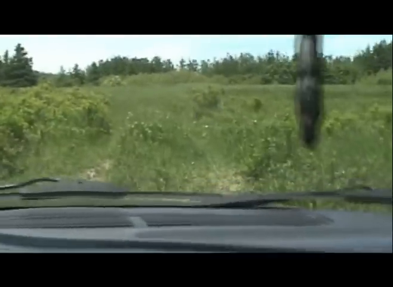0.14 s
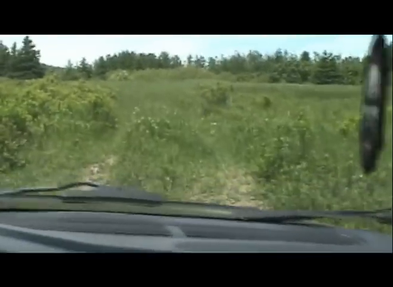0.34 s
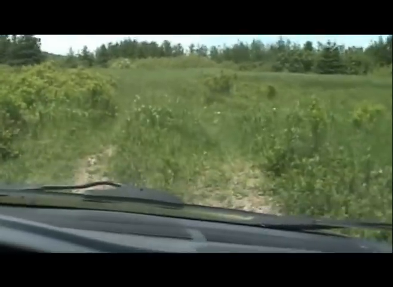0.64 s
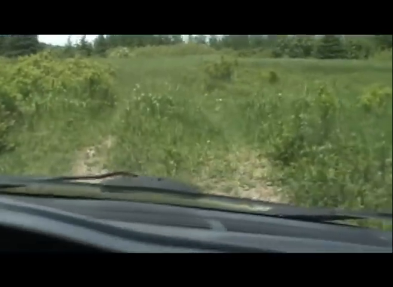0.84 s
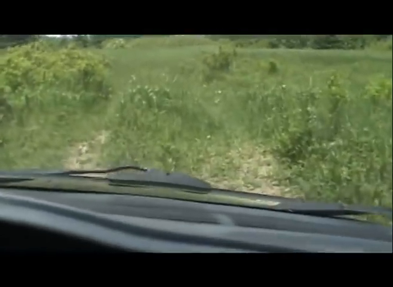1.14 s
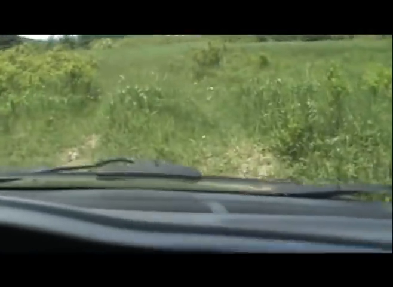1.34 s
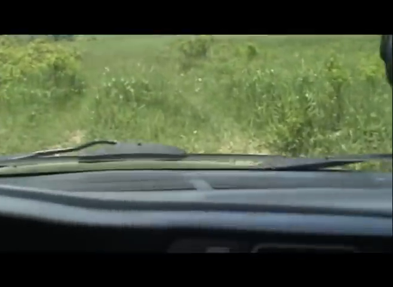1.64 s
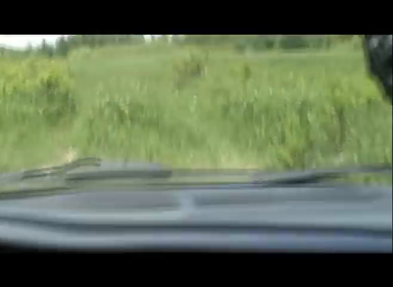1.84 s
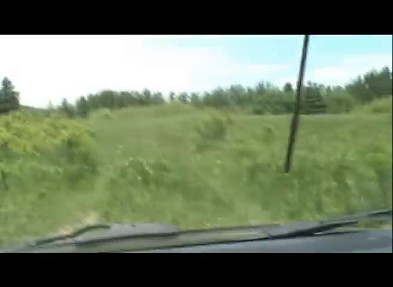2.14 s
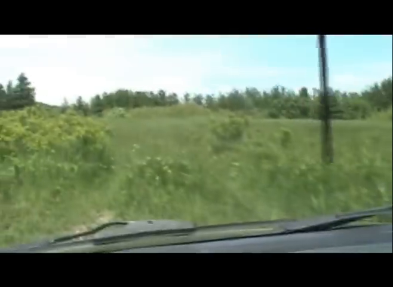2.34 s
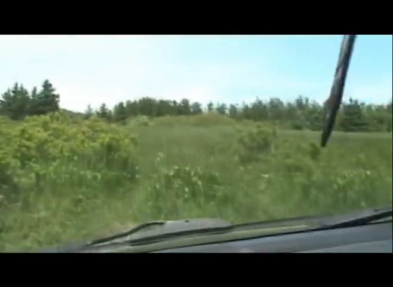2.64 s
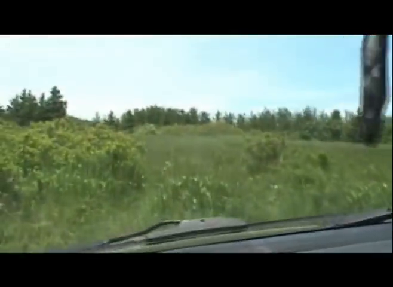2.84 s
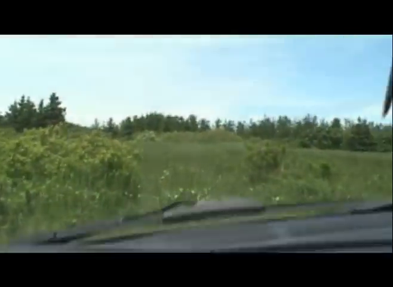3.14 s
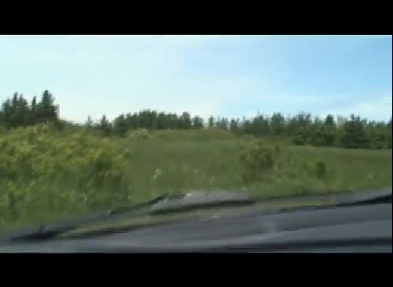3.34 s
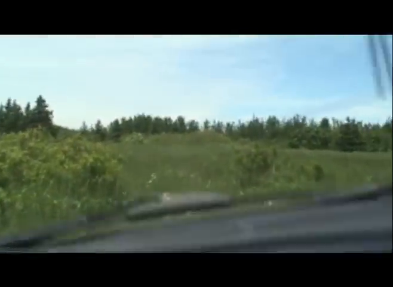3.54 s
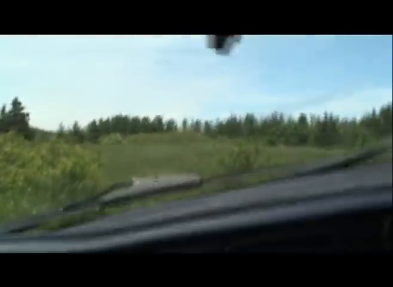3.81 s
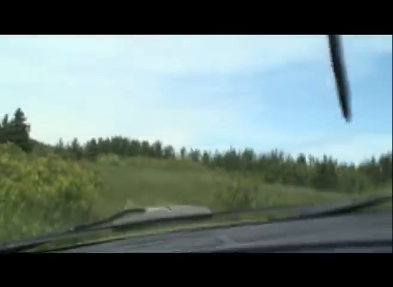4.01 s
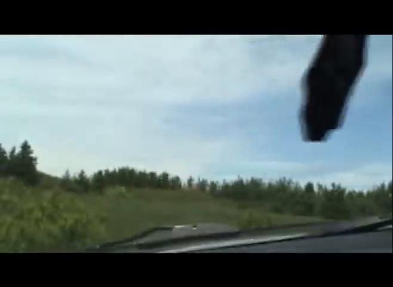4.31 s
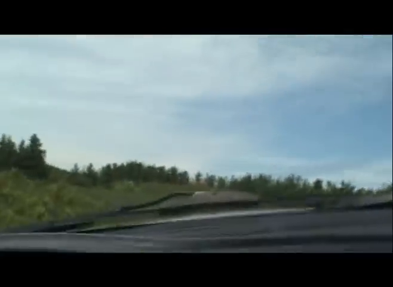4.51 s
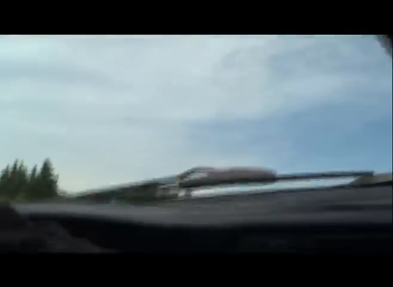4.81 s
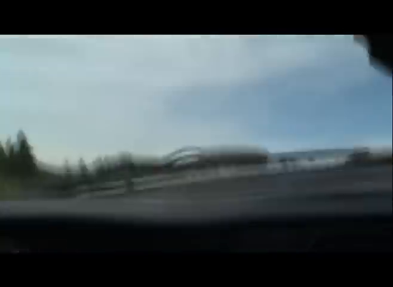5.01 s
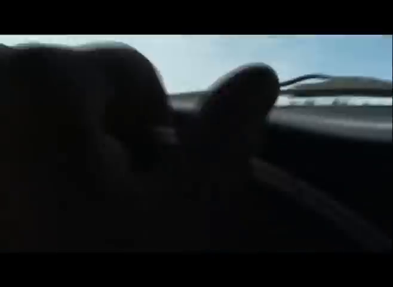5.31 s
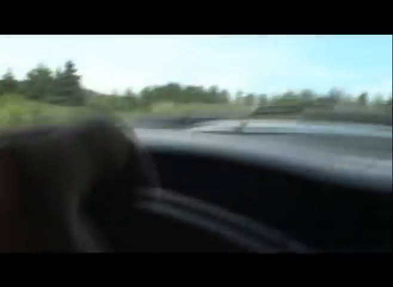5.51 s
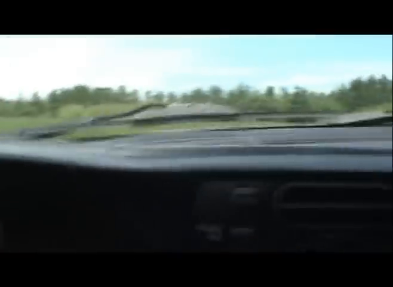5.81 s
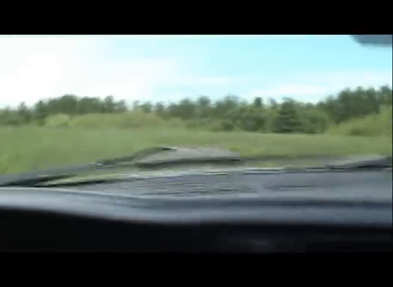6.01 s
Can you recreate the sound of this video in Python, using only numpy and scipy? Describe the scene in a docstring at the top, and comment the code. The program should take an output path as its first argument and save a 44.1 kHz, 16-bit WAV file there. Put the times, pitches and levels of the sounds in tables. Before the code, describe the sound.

Heard from inside, a pickup rumbles over bumpy ground while loose gear knocks and the trim rattles harder and harder.

```python
"""Pickup cab on a rough trail

A six-cylinder pickup crawls over grassy ruts, heard from inside. The engine hums low, the tyres rumble
through the body and the suspension thumps. Loose trim and gear knock, creak and rattle; a vent hisses.
Of the two microphones, the right is weak in the bass and the left overloads on the big jolts."""
import sys
import numpy as np
from scipy import signal
from scipy.fft import rfft, irfft, next_fast_len
from scipy.io import wavfile
from scipy.ndimage import uniform_filter1d

SR = 44100
rng = np.random.default_rng(int(sys.argv[2]) if len(sys.argv) > 2 else 0)


def master(y):
    """Save y as 16-bit WAV."""
    cut = np.clip(np.atleast_2d(y).T, -1, 1)
    pcm = np.round(cut * 32767)  # scale
    wavfile.write(sys.argv[1], SR, pcm.astype(np.int16))


N = 271656
TIME = np.arange(N) / SR

# pitches at which the trim panels ring: f/Hz, width/Hz, level/dB
TRIM_PANELS = [(462, 78, 5), (749, 69, 4.5), (926, 35, 0.5), (1240, 770, -4.5), (1940, 110, -0.5),
               (2440, 520, -6.5), (3000, 110, -20), (3890, 920, -4), (4580, 1500, -13), (6140, 2400, -1),
               (9470, 1400, -7)]
# tone of the cab's deep boom: f/Hz, level/dB
BOOM_TONE = [(40, -57), (62, -2), (100, -3.5), (125, 3.5), (175, 5), (240, 3), (300, -0.5), (360, -11),
             (600, -32), (3000, -70.5)]


def undb(db):
    """Turn decibels into a gain."""
    return 10 ** (np.asarray(db) / 20)


def unit(x):
    """Scale to an average (rms) level of 1."""
    return x / np.sqrt(np.mean(x ** 2))


def curves(table):
    """Join rows of (time, values) with straight lines: one curve per value column."""
    times, *columns = np.transpose(table)
    return [np.interp(TIME, times, column) for column in columns]


def add(out, start, x):
    """Mix x into out from start, in seconds."""
    i = max(int(start * SR), 0)
    out[..., i:i + x.shape[-1]] += x[..., :N - i]


def colour(x, points):
    """Shape the tone of x along points of f/Hz, level/dB."""
    n = next_fast_len(x.shape[-1] + 4096)
    hz, db = np.transpose(points)
    log_gain = np.log(undb(np.interp(np.log(np.fft.rfftfreq(n, 1 / SR) + 1), np.log(hz), db)))
    cepstrum = irfft(log_gain, n)
    cepstrum[1:n // 2] *= 2  # folded so that the filter rings only after a hit
    cepstrum[n // 2 + 1:] = 0
    return irfft(rfft(x, n) * np.exp(rfft(cepstrum)), n)[..., :x.shape[-1]]


def resonate(x, hz, width):
    """Let x ring at one pitch; a narrower width rings longer."""
    return signal.lfilter(*signal.iirpeak(hz, hz / width, fs=SR), x)


def walk(rate):
    """A smooth random wobble that takes rate steps a second."""
    hold = int(SR / rate)
    steps = np.repeat(rng.standard_normal(N // hold + 1), hold)
    return unit(uniform_filter1d(uniform_filter1d(steps, hold), hold)[:N])


def stereo_noise(size, spread):
    """Noise for left and right; more spread makes it wider."""
    mid, side = rng.standard_normal((2, size))
    return np.array([mid + spread * side, mid - spread * side])


def muffle(x, top_hz=12500):
    """Sound that comes through panels and ducts loses its highest treble."""
    return signal.sosfilt(signal.ellip(6, .5, 60, top_hz, fs=SR, output="sos"), x)


def vent():
    """Steady air hisses from the dashboard, with a faint thin whistle."""
    # tone of the air: f/Hz, level/dB
    air_tone = [(1500, -3.5), (3500, -3), (5000, 0), (5750, 6), (6500, -2.5), (8000, -9), (10500, -7.5),
                (12500, -19.5)]
    hiss = unit(colour(stereo_noise(N, .45), air_tone)) * undb(-53)
    whistle_hz = 7975 + 20 * walk(30)
    whistle = np.sin(2 * np.pi * np.cumsum(whistle_hz) / SR) * undb(-72 + 2 * walk(5))
    return hiss + whistle


def rattle(rattle_db):
    """Trim and twigs under the truck make countless tiny hits, each ringing mostly one panel."""
    # tone of the rattle: f/Hz, level/dB
    rattle_tone = [(600, -4.5), (1200, 6), (1800, -4.5), (2600, 2.5), (4000, -1.5), (6500, -7),
                   (9000, -8.5), (12500, -34)]
    hits_per_s = 70 * undb(.6 * (rattle_db + 43))  # harder shaking, more hits
    fade, grains = undb(-60 / (.059 * SR)), 0
    for hz, width, _ in TRIM_PANELS[2:]:
        hits = rng.random(N) < hits_per_s / SR
        ticks = hits * undb(5.3 * np.minimum(rng.exponential(size=N), 4))
        bursts = stereo_noise(N, .96) * np.sqrt(signal.lfilter([1], [1, -fade ** 2], ticks ** 2))
        grains = grains + .3 * bursts + resonate(bursts, hz, 2 * width)
    return unit(colour(grains, rattle_tone)) * undb(rattle_db)


def creaks():
    """The seat and panels stick and slip in quick jerks that ring at one pitch."""
    # each creak: t/s, length/s, f/Hz, level/dB
    rubs = [(2.13, 0.048, 640, -28.5), (2.71, 0.033, 527, -29.5), (4.963, 0.039, 960, -19),
            (5.7, 0.018, 2102, -33), (5.718, 0.017, 3475, -29)]
    out = np.zeros(N)
    for start, length, hz, db in rubs:
        times = np.cumsum(rng.uniform(.002, .006, size=40))
        times = times[times < length]
        slips = np.zeros(SR // 8)
        slips[(times * SR).astype(int)] = rng.uniform(.84, 1, len(times)) * (1 - .5 * times / length)
        ring = resonate(resonate(slips, hz, hz * .25), hz, hz * .7)
        add(out, start, ring * undb(db) / np.sqrt(np.sum(ring ** 2) / (length * SR)))
    return out


def clinks():
    """A small metal piece, shaken by some of the knocks, rings anew at each bounce."""
    # each shake: t/s, level/dB
    shakes = [(5.834, -25), (5.906, -29.5), (5.992, -39)]
    # notes of the metal: f/Hz, level/dB, time to fade by 60 dB/s
    metal_notes = [(3332, -5, .05), (4490, -7, .07), (5932, 0, .1), (7973, -6, .1), (9458, -7, .06)]
    hz, note_db, fade_s = np.transpose(metal_notes)[:, :, None]
    out, t = np.zeros((2, N)), TIME[:SR // 4]
    for start, db in shakes:
        for delay in np.append(0, rng.uniform(.002, .022, size=3)):
            detune = 1 + .004 * rng.standard_normal(hz.shape)
            phase = 2 * np.pi * (hz * t * detune + rng.random((2, *hz.shape)))
            ring = np.sum(undb(db + note_db - 60 * t / fade_s) * np.sin(phase), axis=1)
            add(out, start + delay, ring * undb(-2.5 - 200 * delay))  # later bounces are softer
    return out


def taps(fade_s=.04):
    """Small hard parts chatter where they sit, each ringing around one pitch."""
    # each tap: t/s, f/Hz, level/dB
    hits = [(.66, 3400, -35), (1.017, 4240, -26), (1.762, 3900, -29), (1.806, 3420, -32), (2.12, 660, -12),
            (3.36, 5496, -16.5), (4.215, 2034, -19), (4.954, 4176, -12.5), (4.985, 2370, -19),
            (5.277, 2000, -18.5), (5.491, 14000, -35), (5.833, 2890, -9.5), (5.907, 892, -5.5),
            (5.993, 14300, -27)]
    out, t = np.zeros((2, N)), TIME[:SR // 10]
    for start, hz, db in hits:
        chatter = stereo_noise(len(t), .69) * undb(-60 * t / fade_s)
        ring = resonate(resonate(chatter, hz, 180 + .06 * hz), hz, .6 * hz)
        add(out, start, ring / abs(ring).max() * undb(db + 1))
    return out


def shaking(rise_s=.037, fall_s=.045):
    """Extra decibels while a jolt shakes the whole truck: they rise, hold and fall."""
    # each jolt: t/s, length/s, boost/dB
    jolts = [(1.02, 0.048, 4.2), (2.11, 0.078, 2.63), (2.5, 0.018, 4.6), (2.783, .04, 7.7),
             (3.192, 0.082, 4.3), (4.708, 0.27, 6.1), (4.798, 0.058, 3.3)]
    return sum(db * np.interp(TIME, [at - rise_s, at, at + length, at + length + fall_s], [0, 1, 1, 0])
               for at, length, db in jolts)


def rolling(boom_db, tyre_db):
    """The cab sways and booms while the tyres crush grass and stones in uneven bites."""
    # tones of the tyres and of the sway: f/Hz, level/dB
    tyre_tone = [(60, -37.5), (250, -17.5), (350, -1.5), (410, 0.5), (490, -3.5), (580, -3.5), (740, -5.5),
                 (870, -8), (1200, -11.5), (1700, -14), (3500, -31), (7000, -34.5), (12000, -49)]
    sway_tone = [(10, -12.5), (19, -11.5), (27, -6), (34, -13.5), (50, -22.5), (90, -17.5), (400, -74)]
    sway = unit(colour(stereo_noise(N, .082), sway_tone))
    boom = unit(colour(stereo_noise(N, .5), BOOM_TONE) * undb(1.3 * walk(14)))
    bites = undb(1.6 * walk(90))
    tyres = unit(colour(stereo_noise(N, .7) * bites, tyre_tone))
    return sway * undb(boom_db - 1.5) + boom * undb(boom_db + 2.5) + tyres * undb(tyre_db + 1)


def intake(pulses, phase):
    """With the throttle open, each firing gulps air and makes the intake drone."""
    # how loud the throttle makes the drone: t/s, level/dB
    throttle = [(0, -53.5), (2.5, -41), (3.35, -49), (3.55, -23.5), (3.9, -29), (4.4, -27.5), (4.8, -37.5),
                (5.05, -48), (6.16, -44)]
    # pitches at which the intake rings: f/Hz, width/Hz, level/dB
    intake_notes = [(408, 55, 3.5), (490, 15, 1), (755, 32, -2), (1035, 94, -5)]
    gulps = pulses + .075 * rng.standard_normal(N) * (1 + np.cos(phase)) / 2
    ring = sum(undb(db) * resonate(gulps, hz, width) for hz, width, db in intake_notes)
    drone = colour(ring, [(150, -12.5), (380, -3.5), (1000, -10.5), (2000, -21.5), (6000, -16)])
    return unit(drone) * undb(curves(throttle)[0])


def engine(boom_db):
    """Six cylinders fire unevenly every two turns; mostly their lowest tones reach the cab."""
    # engine speed as a firing rate: t/s, f/Hz
    speed = [(0, 73.86), (1.1, 77.7), (1.5, 76.26), (2.25, 81.43), (2.9, 72.3), (3.3, 72.02), (3.9, 81.88),
             (4.45, 79.72), (5.15, 62.2), (5.5, 64.72), (5.8, 65.5), (6.16, 71.7)]
    # how hard the engine pulls on its mounts: t/s, level/dB
    pull = [(0, -40), (1.3, -46.5), (1.85, -38.5), (2.38, -42), (2.52, -35.5), (3.6, -37), (4.0, -28.5),
            (4.9, -31), (6.16, -31.5)]
    # how the cab's body and air boost some pitches of the hum: f/Hz, level/dB
    cab_tone = [(32, 7), (40, 2.5), (62, -10.5), (75, -0.5), (82, 2), (100, -4), (160, -2.5)]
    firing_hz, pull_db = curves(speed) + curves(pull)
    phase = 2 * np.pi * np.cumsum(firing_hz * (1 + .006053 * walk(18))) / SR
    hum = 0
    # one row of cylinders, all six, the slightly faster fan, the octave above the firing
    for multiple, db in (.5, -1.4), (1, -1.2), (1.25, -5), (2, -4.5):
        cab_db = np.interp(multiple * firing_hz, *np.transpose(cab_tone))
        hum += undb(pull_db + db + cab_db + 2.7 * walk(9)) * np.sin(multiple * phase)
    firings = np.flatnonzero(np.diff(np.floor(phase / (2 * np.pi))))
    cylinder_db = np.resize([0, -2, 1, -2, -1, -3], len(firings))
    pulses = np.zeros(N)
    pulses[firings] = undb(cylinder_db + 1.5 * rng.standard_normal(len(firings)))
    growl = colour(pulses, [(70, -31), (140, -.5), (230, -.5), (330, -8), (410, -8.5), (600, -19),
                            (1500, -57.5), (6000, -77)])
    return np.sqrt(2) * hum + unit(growl) * undb(boom_db - 5.5) + intake(pulses, phase)


def knocks(chatter_s=.004, crack_s=.00064):
    """Loose gear hits the trim, rings the panels and dies away in the padded cab."""
    # each knock, with its own loudness and brightness: t/s, level/dB, treble tilt/dB per octave
    hits = [(0.331, -9, -11), (.568, 5.5, -1), (.582, 3.5, -2.5), (0.644, -3.5, -8), (1.07, -1.5, -1.5),
            (1.278, 7, 5), (1.934, 0.5, -1), (2.036, 4.5, -2), (2.12, 2, -14.5), (2.283, -11, -10),
            (2.794, 12.5, -6.5), (2.813, 6, -6), (3.072, 2, -5), (3.177, 3, -4), (3.361, 15, -1),
            (3.522, 4.5, -2), (3.559, 8, -1.5), (3.585, -7.5, 9.5), (3.694, 5.5, -0.5), (3.732, 22.5, .5),
            (3.776, 3, 1.5), (4.215, 15, 0.5), (4.413, 2, 3), (4.478, 4, 2.5), (4.732, 5.5, 4),
            (4.746, 15.5, 1.5), (4.804, 15.5, -2), (4.817, 5, 2.5), (4.852, 10, 3), (4.908, 9.5, -3),
            (4.955, 7.5, 3.5), (5.201, 6, -2.5), (5.277, 12.5, -1.5), (5.332, 0.5, 4), (5.49, -9, 13.5),
            (5.724, 5.5, 2), (5.833, 19, 0.5), (5.907, 18.5, 0.6), (5.946, -1, -6), (5.992, 2.5, 11),
            (6.125, -2, -7.5)]
    # tone of a knock before its tilt: f/Hz, level/dB
    knock_tone = [(150, -1), (400, -1), (850, 2), (2100, 1), (4400, -10), (8800, -17.5), (12500, -31),
                  (15500, -49)]
    tone_hz, tone_db = np.transpose(knock_tone)
    octaves = np.log2(np.maximum(tone_hz, 820) / 2040)  # the tilt pivots at 2040 Hz, flat below 820 Hz
    out, t = np.zeros((2, N)), TIME[:SR // 8]
    crack = 1 + undb(1) * np.exp(-t / crack_s)  # the first touch is the hardest
    for start, db, tilt in hits:
        contact = stereo_noise(len(t), .45) * undb(-60 * np.maximum(t - chatter_s, 0) / .028)
        echo = stereo_noise(len(t), .7) * undb(-8 - 60 * t / .09)
        push = contact * crack + echo
        ring = .35 * push + sum(undb(gain) * resonate(push, hz, width) for hz, width, gain in TRIM_PANELS)
        ring /= np.sqrt(np.sum(ring ** 2) / 2)
        add(out, start, colour(ring, np.c_[tone_hz, tone_db + tilt * octaves]) * undb(db - 1.5))
    return out


def thumps(swell_s=.008, rebound_s=.027, lead_s=.03):
    """The axle strikes softly and rebounds; hard blows buzz the trim, and a weak boom hangs on."""
    # each thump: t/s at its peak, level/dB, f/Hz, rebound/dB relative to the first blow
    ruts = [(1.042, -18.5, 179, -4.5), (1.113, -18.5, 140, -5.5), (1.76, -12.5, 176, -23),
            (2.504, -10, 232, -1.5), (2.607, -10, 221, -2.5), (2.774, -8, 205, -4.5),
            (2.927, -7.5, 211.5, -3.5), (3.205, -3, 192, -6), (3.357, -5.5, 246.8, -11),
            (4.039, -14, 180, -1), (4.55, -16, 206, -12), (4.678, -14.5, 329.2, -9), (4.714, -4, 257.2, -2),
            (4.77, -10.5, 197.5, -10), (4.82, -10.5, 222, -6), (4.853, -12.5, 352, -8)]
    buzz_tone = [(200, -14), (400, 0), (800, -7), (1600, -15), (5000, -32), (12000, -58)]
    out, t = np.zeros((2, N)), TIME[:SR // 4] - lead_s
    swell = np.exp(-.5 * (t / swell_s) ** 2)
    for at, blow_db, hz, rebound_db in ruts:
        for delay, db in (0, blow_db), (rebound_s, blow_db + rebound_db):
            phase = 2 * np.pi * (hz * t + rng.random())
            blow = swell * (np.sin(phase) + undb(-5) * (np.sin(.61 * phase) + np.sin(1.257 * phase)))
            boom = unit(colour(stereo_noise(len(t), .6), BOOM_TONE)) * (t > 0) * undb(-16 - 60 * t / .16)
            buzz = unit(colour(stereo_noise(len(t), .7), buzz_tone)) * swell * undb(-15 + .27 * db)
            add(out, at + delay - lead_s, (blow + boom + buzz) * undb(db - 1.5))
    return out


def scene():
    """The trail sets the boom and the tyres, loose things rattle along, and jolts lift all three."""
    # roughness of the trail: t/s, boom level/dB, tyre level/dB
    trail = [(0, -37.5, -41), (.7, -35, -37.5), (1.55, -35, -40), (2.1, -36, -34.5), (2.38, -37, -37),
             (2.62, -28, -35), (3.08, -34, -37), (3.42, -24.5, -32.5), (3.8, -28.5, -30),
             (4.65, -25.5, -30.5), (5.0, -28, -29.5), (5.2, -35.5, -34.5), (5.7, -33, -35.5),
             (6.16, -33.5, -36)]
    # loose things rattle more as the ride goes on: t/s, level/dB
    looseness = [(0, -50.5), (1.6, -49.5), (3.6, -46.5), (4.6, -42.5), (5.0, -42), (6.16, -45)]
    boom_db, tyre_db, rattle_db = curves(trail) + curves(looseness)
    jolt_db = shaking()
    drive = engine(boom_db) + rolling(boom_db + jolt_db, tyre_db + jolt_db)
    cab = rattle(rattle_db + jolt_db) + thumps() + vent() + clinks() + creaks()
    return muffle(drive + cab) + knocks() + taps()


def record(dry, top_hz=15500):
    """Two unequal microphones clip the loudest peaks and lose the highest treble."""
    # how much louder the left microphone is than the right: f/Hz, level/dB
    imbalance = [(25, 8), (60, 27.5), (110, 17.5), (190, 23), (300, 16.5), (450, 16.5), (750, 13),
                 (1290, 10.5), (2380, 7), (4400, 3), (8120, 5), (13000, -2)]
    hz, gap_db = np.transpose(imbalance)
    right_db = 20 * np.log10(2 / (1 + undb(gap_db)))
    left = colour(dry[0], np.c_[hz, right_db + gap_db])
    right = colour(dry[1], np.c_[hz, right_db])
    clipped = np.clip([left, right], -1, 1)
    return signal.sosfilt(signal.ellip(8, .2, 70, top_hz, fs=SR, output="sos"), clipped)


dry = scene()
out = record(dry)
master(out)
```